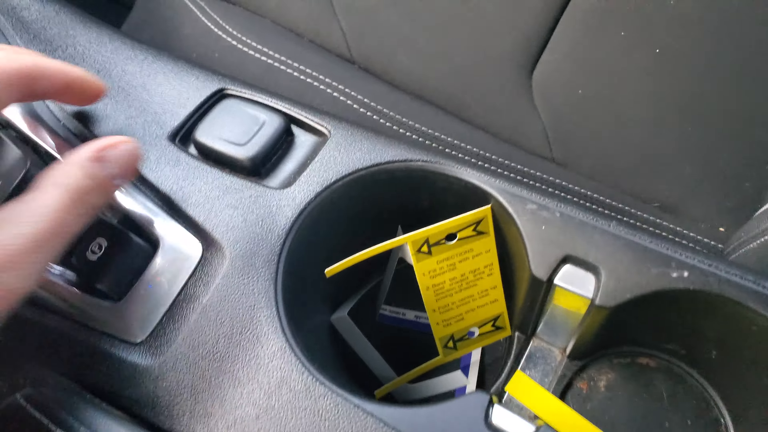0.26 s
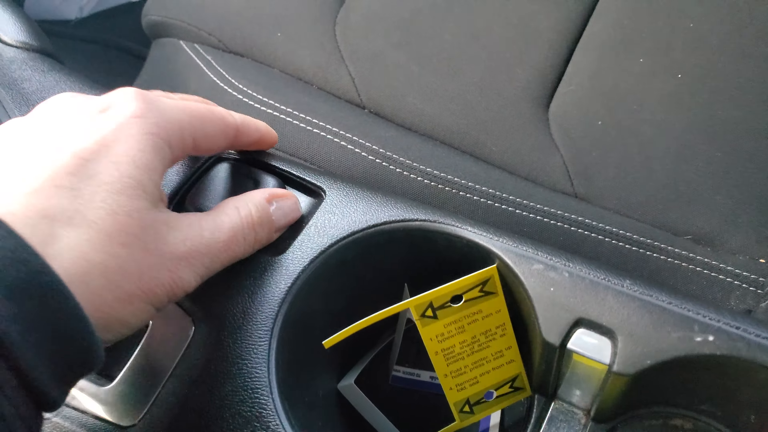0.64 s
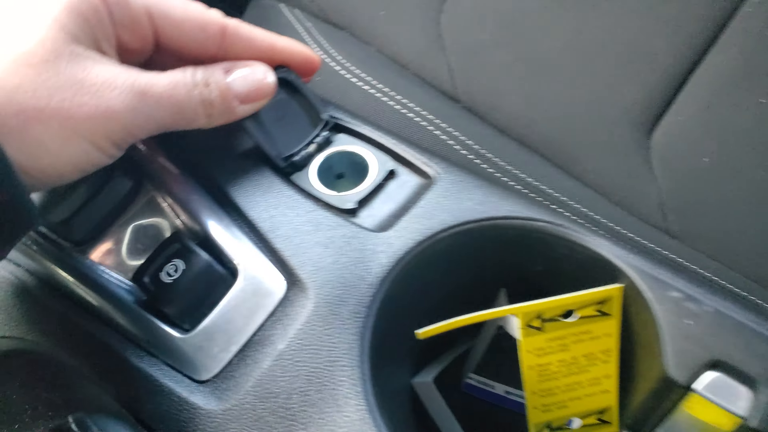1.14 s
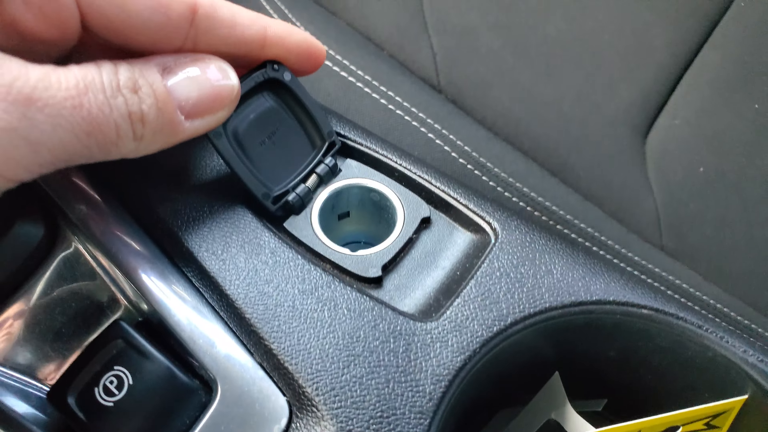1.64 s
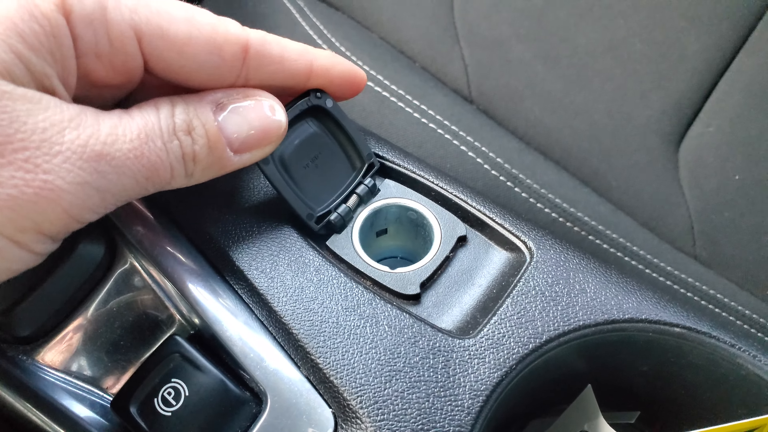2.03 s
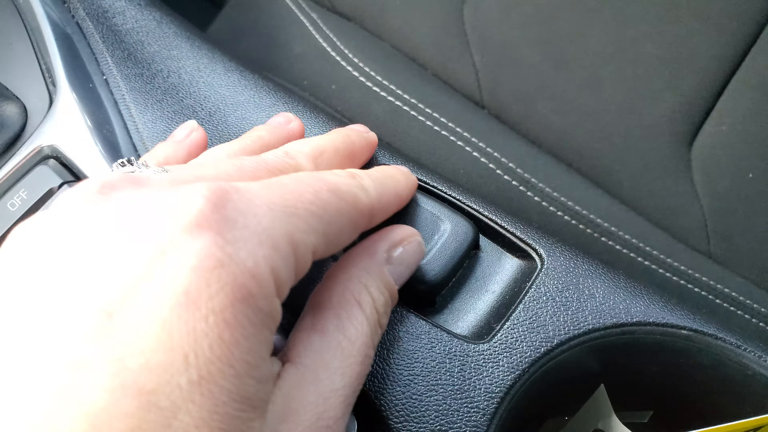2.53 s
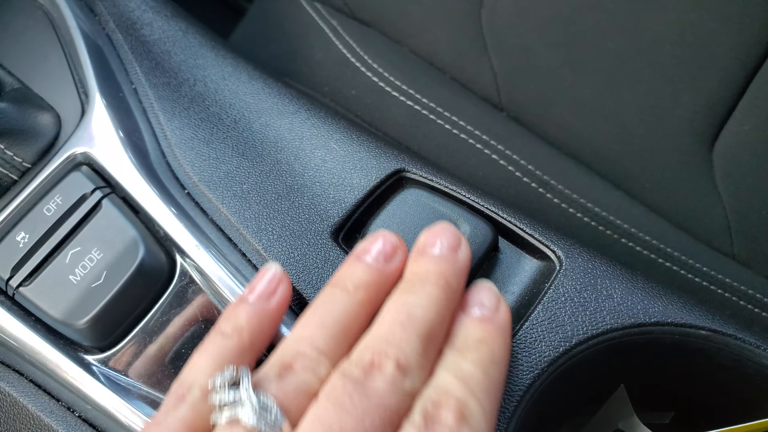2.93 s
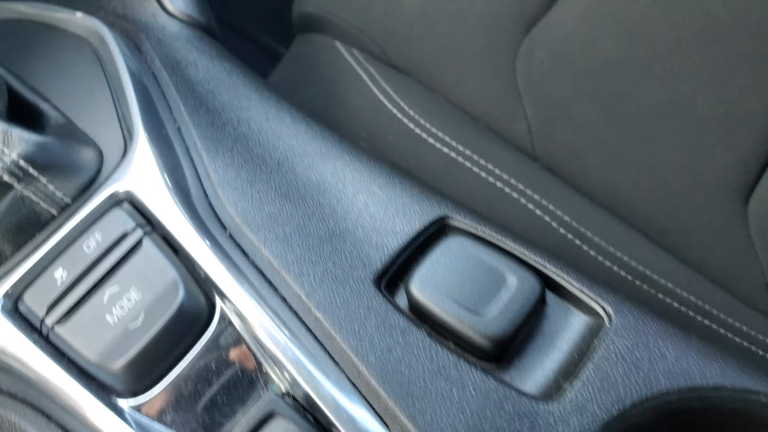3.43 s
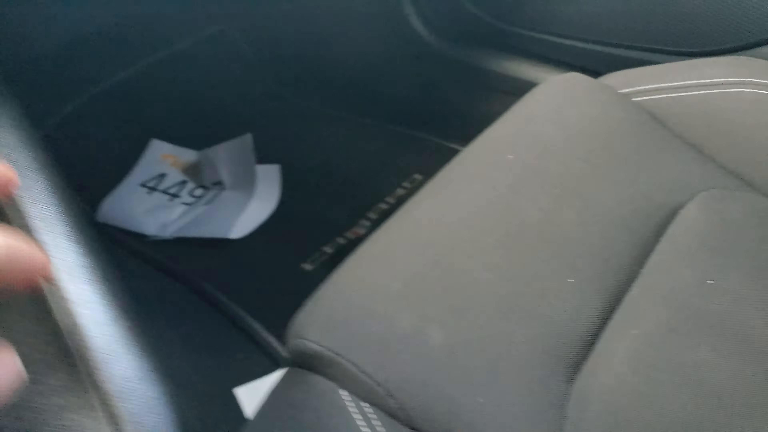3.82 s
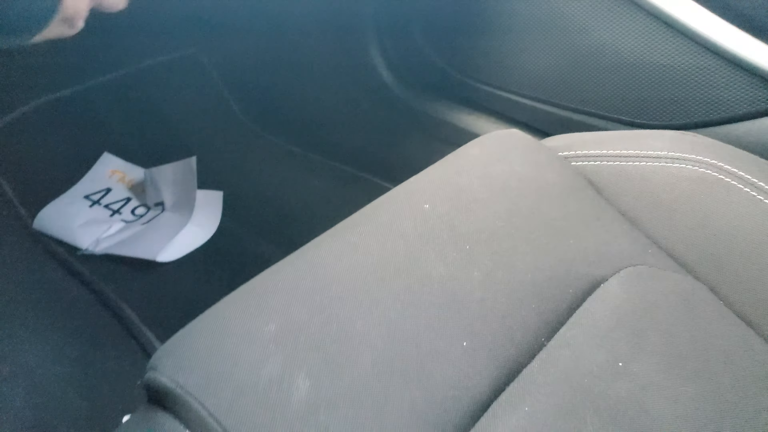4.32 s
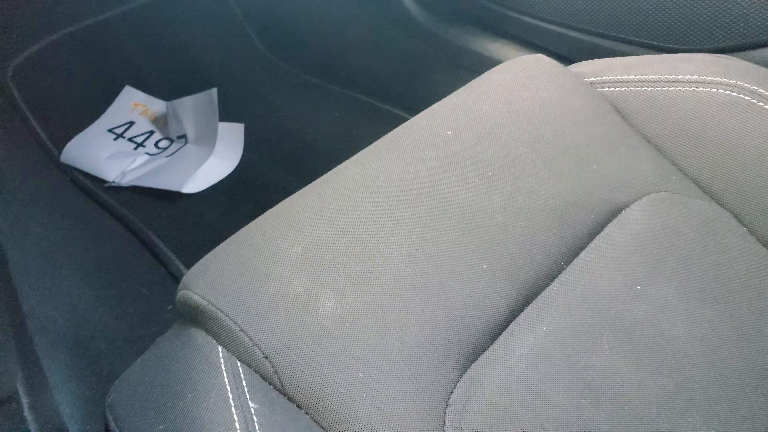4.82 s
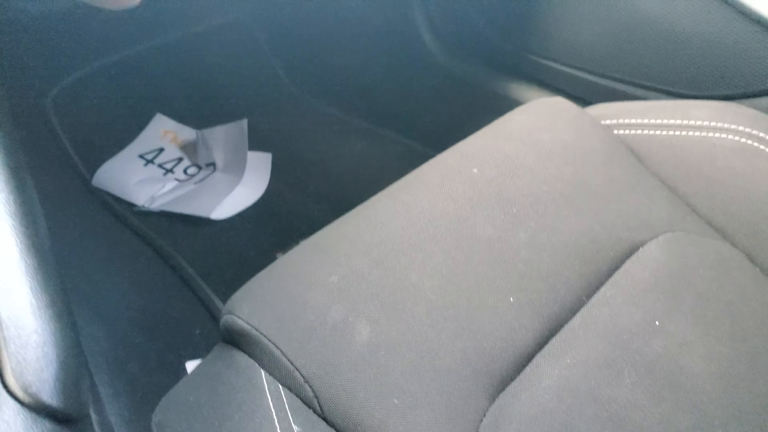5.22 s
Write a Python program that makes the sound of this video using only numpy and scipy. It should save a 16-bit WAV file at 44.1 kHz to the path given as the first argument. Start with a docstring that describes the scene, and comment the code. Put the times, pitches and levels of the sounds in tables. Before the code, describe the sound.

Inside a parked car, an engine idles with a low hum. Close to the microphone, fingers rub and tap the console, click a small plastic socket lid open, then snap it sharply shut. The hum dips for about a second after the snap. A hand swishes over the plastic, a sleeve rustles with dull thumps and light ticks, and two loud knocks ring the hollow trim near the end.

```python
"""An engine hums inside a parked car while a hand flips a power socket's plastic lid open and snaps it shut.
The snap makes the phone turn the hum down for about a second. Then a sleeve rustles past and two
loud knocks ring the plastic trim. The hum is a stack of tones tied to the engine's firing, over a rumble.
Skin and cloth make noise by catching and slipping; struck plastic cracks and rings at its own pitches."""
import sys
import numpy as np
from scipy import signal
from scipy.fft import rfft, irfft, next_fast_len
from scipy.io import wavfile
from scipy.ndimage import uniform_filter1d, minimum_filter1d

SR = 44100
rng = np.random.default_rng(int(sys.argv[2]) if len(sys.argv) > 2 else 0)


def persist_wave(psi):
    """Save psi, clipped to +-1, as 16-bit WAV."""
    counts = np.round(np.clip(psi, -1, 1) * 32767).astype(np.int16)
    wavfile.write(sys.argv[1], SR, np.atleast_2d(counts).T)


N = 241006
T = np.arange(N) / SR
HIT_T = T[:SR // 6]  # the time axis of one short hit

# tone colour of skin rubbing on plastic: f/Hz, level/dB
SKIN = [(200, 4), (600, 3.5), (1000, -1.5), (1400, 2.5), (1900, -6.5), (3000, -4.5), (4200, -2), (5500, -7),
        (6700, -4.5), (8200, -13), (11000, -10.5), (16000, -12.5)]
# tone colour of a plastic crack: f/Hz, level/dB
CRACK = [(100, -8.5), (400, -5), (1200, -4.5), (1900, -8.5), (2750, 5.5), (4500, -2.5), (6500, -2),
         (8000, -7.5), (10500, -6), (13000, -4.5), (16000, -7.5)]


def undb(db):
    """Turn decibels into a number to multiply by."""
    return np.exp(np.asarray(db) * np.log(10) / 20)


def unit(x):
    """Scale a sound to an average (rms) level of 1."""
    return x / np.sqrt(np.mean(x ** 2))


def unit_hit(x):
    """Give each channel of a short sound the energy of 10 ms at level 1."""
    return x / np.sqrt(np.sum(x ** 2, axis=-1, keepdims=True) / (SR / 100))


def add(out, at_s, sound):
    """Mix a stereo sound in at the given time."""
    i = max(int(at_s * SR), 0)
    out[:, i:i + sound.shape[1]] += sound[:, :N - i]


def wander(rate_hz):
    """A smooth random drift that typically strays about 1 from zero."""
    hold = int(SR / rate_hz)
    steps = np.repeat(rng.standard_normal(N // hold + 1), hold)
    return 1.3 * uniform_filter1d(uniform_filter1d(steps, hold), hold)[:N]


def colour(x, points, tilt_db=0, ring_hz=1000, ring_db=0, ring_width=0.12):
    """Shape a sound by (f/Hz, level/dB) points, a tilt in dB per octave and one optional ringing peak."""
    hz, db = np.transpose(points)
    size = 2 * next_fast_len(x.shape[-1] // 2 + 1, real=True)
    spectrum = rfft(x.astype(np.float32), size)
    f = np.maximum(np.fft.rfftfreq(size, 1 / SR), 1)
    shape_db = np.interp(np.log2(f), np.log2(hz), db + tilt_db * np.log2(hz / hz[0]))
    peak_db = ring_db / (1 + ((f / ring_hz - 1) / ring_width) ** 2)
    return irfft(spectrum * undb(shape_db + peak_db), size)[..., :x.shape[-1]]


def soften(x, cutoff_hz, order=2):
    """A softer touch loses the treble above its cutoff."""
    return signal.lfilter(*signal.butter(order, min(cutoff_hz, .45 * SR), fs=SR), x)


def two_mics(noises, apart_hz=650, bass_side=0.12):
    """Spread two noises over the left and right microphones: alike in the bass, unrelated in the treble."""
    mid, side = noises
    side = side - (1 - bass_side) * soften(side, apart_hz, order=1)
    return np.array([mid + side, mid - side])


def stroke(peak_s, length_s, rise, roundness=1.22):
    """Start time and speed (0-1) of a move. Rise is the share spent speeding up; roundness 2 is a bell."""
    start = max(peak_s - 3 * rise * length_s, 0)
    from_peak = T[:3 * SR // 2] + start - peak_s
    width = length_s * np.where(from_peak < 0, rise, 1 - rise)
    return start, np.exp(-np.abs(from_peak / width) ** roundness)


def friction(size, grain_db):
    """Rubbing noise made of tiny slips; more grain makes a few of them stand out."""
    strength = undb(grain_db * np.minimum(rng.exponential(1, size // 16 + 1), 6))
    return two_mics(rng.standard_normal((2, size)) * np.repeat(strength, 16)[:size])


def fade(t60):
    """Die away by 60 dB in t60 seconds, the fade time."""
    return np.exp(-np.log(1000) * HIT_T / t60)


def burst(points, t60, tilt_db=0, ring_hz=1000, ring_db=0, ring_width=.12):
    """A short puff of shaped noise that dies away."""
    noise = two_mics(rng.standard_normal((2, len(HIT_T))))
    return unit_hit(colour(noise, points, tilt_db, ring_hz, ring_db, ring_width) * fade(t60))


def ring_tone(hz, t60, apart_hz=1700):
    """One fading tone of a struck part; high tones reach the two microphones out of step."""
    phase, side = rng.uniform(-np.pi, np.pi, 2)
    lag = np.sign(side) * np.pi / 4 * min(np.sqrt(hz / apart_hz), 1)
    angle = 2 * np.pi * hz * HIT_T + phase + np.array([[lag], [-lag]])
    return np.sin(angle.astype(np.float32)) * fade(t60)


def boom(hz, t60, push_s=0.0038):
    """A low fading tone set going by a slow push, the same on both sides."""
    push = 1 - np.exp(-HIT_T / push_s)
    wave = -np.sin(2 * np.pi * hz * HIT_T) * fade(t60) * push
    return unit_hit(np.array([wave, wave]))


def engine(firing_hz=36.73, drift_hz=.3, shake_db=1.82, uneven_db=2.5, rumble_db=-44.5, throb=0.08):
    """The idling engine hums at multiples of its firing rate, over a rumble that throbs with each firing."""
    # tones of the hum: multiple of the firing rate, base level/dB, dB gained per dB of cabin_spots
    hum_tones = [(1, -34.5, 0.13), (2, -44.5, 0), (3, -53, 0.47), (4, -50, 0.54), (4.5, -53, 0.67),
                 (6, -71.5, -1.17), (9.5, -65, 1)]
    # the phone moves through the cabin's loud and quiet spots (a standing wave): t/s, level/dB
    cabin_spots = [(0, -7.5), (.7, -0.5), (1.4, -2.5), (2.2, -1), (2.7, -3), (3.4, 0), (4.0, 9), (4.4, 5),
                   (5.0, 8), (5.46, 2.5)]
    # tone colour of the low engine and fan rumble, with a faint high hiss on top: f/Hz, level/dB
    rumble_and_hiss = [(20, -14.5), (35, -6), (65, 0), (120, -2.5), (200, -10), (320, -12.5), (440, -13.5),
                       (560, -21), (740, -29), (850, -28), (1200, -40), (2200, -50), (7000, -59.5),
                       (11000, -61.5), (16000, -56.5)]
    spot_db = np.interp(T, *np.transpose(cabin_spots))
    phase = 2 * np.pi * np.cumsum(firing_hz + drift_hz * wander(3)) / SR
    lead = np.pi * firing_hz * 0.00027 * np.array([[1], [-1]])  # the hum arrives 0.27 ms sooner on the left
    hum = 0
    for multiple, db, share in hum_tones:
        # uneven firing disturbs the upper tones more than the lowest one
        wobble_db = shake_db if multiple == 1 else uneven_db
        angle = multiple * (phase + lead) + rng.uniform(0, 2 * np.pi) + 0.1 * wobble_db * wander(12)
        level = undb(db + share * spot_db + wobble_db * wander(12))
        hum = hum + np.sqrt(2) * level * np.sin(angle.astype(np.float32))
    noise = unit(colour(two_mics(rng.standard_normal((2, N))), rumble_and_hiss))
    noise = noise * (1 + throb * np.sin(phase))
    return hum + noise * undb(rumble_db + 0.43 * spot_db - 0.68 * wander(5.6))


def palm(grain_db=1.0, judder_db=1.3):
    """The flat hand glides smoothly over the console with one broad swish."""
    # glides: peak t/s, length/s, level/dB, tilt/dB per octave, swish f/Hz
    glides = [(0.166, 0.93, -63, -2.5, 3300), (2.493, .13, -56, -1.5, 2950), (2.73, 0.22, -66, 1, 3030),
              (2.951, 0.3, -51, 2, 3700), (3.13, 0.22, -49, 0.5, 1700), (3.166, .22, -46.5, 7.5, 12000),
              (3.36, 0.21, -60.5, 5, 11500), (3.615, .12, -53, -1.5, 3000), (4.33, 0.23, -55.5, 5, 12900)]
    out = np.zeros((2, N))
    for peak_s, length_s, db, tilt_db, hz in glides:
        start, speed = stroke(peak_s, length_s, rise=0.49)
        swish = colour(friction(len(speed), grain_db), SKIN, tilt_db, hz, ring_db=8, ring_width=0.17)
        add(out, start, undb(db) * speed * unit(swish))
    return out * undb(judder_db * wander(64))


def sleeve(grain_db=1.46, flutter_db=0.6, dulling_db_per_octave=2.5):
    """Cloth fibres catch and slip; each arm movement is loudest where it is fastest."""
    # arm movements: peak t/s, length/s, level/dB, tilt at full speed/dB per octave
    arm_moves = [(.13, 0.2, -57, -5.5), (1.104, 0.36, -64.5, 1), (1.401, .24, -63.5, -1.5),
                 (3.727, .2, -53.5, -3), (4.06, .5, -47, -3), (4.41, .32, -49, -0.4),
                 (4.587, .09, -51.5, 1), (4.685, .09, -42.5, -1.5), (4.904, 0.12, -55.5, 0.5),
                 (5.064, .14, -48.5, -0.5), (5.341, .085, -51, 2), (5.379, 0.29, -55, -1.5)]
    # tone colour of rubbing cloth: f/Hz, level/dB
    cloth = [(40, 5.5), (100, 2), (250, 7), (700, 3.5), (1600, 4.5), (2400, 1.5), (4000, -2), (6500, -6),
             (8500, -13.5), (12500, -10.5), (16000, -14.5)]
    out = np.zeros((2, N))
    for peak_s, length_s, db, tilt_db in arm_moves:
        # the heavy arm keeps its speed longer than the fingers do
        start, speed = stroke(peak_s, length_s, rise=0.44, roundness=1.65)
        fibres = friction(len(speed), grain_db)
        fast = unit(colour(fibres, cloth, tilt_db))
        slow = unit(colour(fibres, cloth, tilt_db + dulling_db_per_octave))  # thinner; speed dulls it
        rustle = speed * fast + (1 - speed) * slow
        add(out, start, undb(db) * speed * rustle)
    return out * undb(flutter_db * wander(35))


def ticks(echo_db=-18, echo_t60=.06):
    """Nails and small stiff parts tick: a dry crack with one ringing peak, then the cabin's short echo."""
    # light taps: t/s, level/dB, ring f/Hz, ring height/dB, fade time/s
    taps = [(.108, -55, 1330, 29.5, .045), (1.197, -65.5, 3940, -0.5, .012), (2.781, -50.5, 2830, 12, .025),
            (3.2002, -41.5, 5400, 22.5, 0.028), (3.9407, -54.5, 6650, 5.5, 0.019),
            (4.022, -38.5, 6400, -2, 0.033), (4.2417, -38.5, 4270, 21.5, .018),
            (4.5388, -39, 5267, 4.5, 0.049), (4.693, -40.5, 7060, -6, .033), (4.9733, -34, 3400, 2, .03),
            (5.248, -54.5, 3943, 17.5, .05)]
    out = np.zeros((2, N))
    for at_s, db, hz, ring_db, t60 in taps:
        crack = burst(CRACK, t60, ring_hz=hz, ring_db=ring_db, ring_width=0.077)
        crack = unit_hit(soften(crack, cutoff_hz=2.6 * hz))
        echo = undb(echo_db) * burst(SKIN, echo_t60)
        add(out, at_s, undb(db) * unit_hit(crack + echo))
    return out


def fingers(grain_db=0.5, judder_db=3.0):
    """Fingertips catch quickly and judder to rest on the grained plastic, each scrape at its own pitch."""
    # rubs: peak t/s, length/s, level/dB, tilt/dB per octave, scrape f/Hz, scrape height/dB
    rubs = [(0.372, 0.031, -55.5, 1.5, 1370, 6.5), (0.404, .06, -39.5, -1.5, 1334, 8),
            (0.567, .02, -39, -4, 5070, 14), (0.595, 0.065, -49, -1, 1400, 1),
            (0.712, 0.079, -49.5, 1, 6700, 6.5), (0.841, 0.026, -59.5, 3, 6620, 12),
            (2.165, 0.022, -54, -1, 6460, 11), (2.246, 0.021, -60.5, -3, 1400, 19),
            (4.407, .026, -43.5, .3, 2900, 12.5), (4.645, .019, -36.5, -5, 2660, 10.5)]
    out = np.zeros((2, N))
    for peak_s, length_s, db, tilt_db, hz, scrape_db in rubs:
        start, speed = stroke(peak_s, length_s, rise=.3)
        scrape = colour(friction(len(speed), grain_db), SKIN, tilt_db, hz, scrape_db, ring_width=0.073)
        add(out, start, undb(db) * speed * unit(scrape))
    return out * undb(judder_db * wander(64))


def knocks(crack_db=-4.5, pitch_scatter=0.012, chatter_s=.007, chatter_db=-4, soft_touch_hz=500):
    """Blows chatter on the hollow trim; a soft one has less treble and makes the panel thud more."""
    # blows on the console: t/s, level/dB, cutoff f/Hz (lower is softer), pitch factor of the spot hit
    blows = [(.397, -48.5, 1000, .86), (0.428, -40.5, 470, .78), (0.456, -46.5, 420, 0.78),
             (.564, -44, 700, .76), (.623, -42.5, 800, 0.77), (1.015, -41, 1101, .85),
             (2.381, -31.5, 1000, 1.2), (2.408, -27.5, 1100, 1), (2.782, -50.5, 3300, 1),
             (3.2261, -44.5, 2300, 1.2), (3.718, -52, 1505, .58), (4.641, -41, 3427, .88),
             (4.69, -27.5, 700, 1.02), (4.7002, -20.5, 1500, .98), (4.975, -52.5, 1445, 1),
             (5.0644, -10.5, 4960, .975)]
    # tones the trim rings at: f/Hz, level/dB, fade time/s
    trim_tones = [(190, -6, 0.057), (285, -15, 0.1), (380.7, -6, .045), (445, -0.5, 0.08), (622, -3, .05),
                  (822, -4, .055), (1045, 1, 0.037), (1189, -2, 0.044), (1340, -5.5, 0.048),
                  (1569, 3.5, 0.036), (1858, -0.5, .032), (2030, -3, .035), (2440, -7.5, 0.06),
                  (2920, -7.5, .03), (3400, 0.5, .03), (4020, -2, 0.016), (4200, 2.5, 0.029),
                  (5650, -16, .02), (6660, -4.5, .016)]
    out = np.zeros((2, N))
    for at_s, db, cutoff_hz, pitch in blows:
        blow = 0
        # three unevenly spaced contacts, each weaker than the last and on a slightly different spot
        lateness = np.append(0, (np.arange(1, 3) - rng.random(2)) / 2)
        for late in lateness:
            ring = 0
            for hz, tone_db, t60 in trim_tones:
                spot_hz = hz * pitch * (1 + pitch_scatter * rng.standard_normal())
                ring = ring + undb(tone_db) * ring_tone(spot_hz, t60)
            contact = unit_hit(ring) + undb(crack_db) * burst(CRACK, t60=0.033, tilt_db=1.9)
            blow = blow + undb(late * chatter_db) * np.roll(contact, int(late * chatter_s * SR), axis=1)
        add(out, at_s, undb(db) * unit_hit(soften(blow, cutoff_hz, order=1)))
        thud_db = 3.5 - 8.5 * np.log2(cutoff_hz / soft_touch_hz)
        add(out, at_s, undb(db + thud_db) * boom(hz=268.4, t60=0.06))
    return out


def lid(ring_db=-1, crack_t60=0.0087, buzz_t60=0.059):
    """The lid's plug drags in the socket, then the lid cracks, rings and buzzes briefly on its hinge."""
    # drags just before opening and shutting: peak t/s, length/s, level/dB
    drags = [(0.994, .085, -48), (2.381, 0.098, -50)]
    # tone colour of the dragging plug: f/Hz, level/dB
    plug = [(200, 1), (900, -2.5), (1350, 10), (1900, -7), (3200, -3.5), (3900, 3.5), (5200, -6),
            (6300, 3.5), (8000, -14), (10200, -3.5), (12500, -11), (16000, -10.5)]
    # the lid pops open, later snaps shut and rattles home: t/s, level/dB, cutoff f/Hz, buzz level/dB
    snaps = [(1.014, -29.5, 4950, -7), (2.3935, -11, 19000, -7), (2.408, -15, 12000, 1),
             (2.415, -21, 10000, 0.5), (2.419, -19.5, 7000, -2)]
    # tones the lid rings at: f/Hz, level/dB, fade time/s
    lid_tones = [(1330, -12, .03), (2450, -15, 0.017), (2940, -10.5, 0.026), (3676, 1.5, 0.032),
                 (4130, -3.5, 0.034), (4580, -1.5, 0.023), (7100, -12, .02), (10620, 11.5, 0.0074),
                 (14200, 5.5, 0.0028)]
    out = np.zeros((2, N))
    for peak_s, length_s, db in drags:
        start, speed = stroke(peak_s, length_s, rise=.5)
        scrape = colour(friction(len(speed), grain_db=0), plug)
        add(out, start, undb(db) * speed * unit(scrape))
    for at_s, db, cutoff_hz, buzz_db in snaps:
        ring = unit_hit(sum(undb(tone_db) * ring_tone(hz, t60) for hz, tone_db, t60 in lid_tones))
        snap = burst(CRACK, crack_t60) + undb(ring_db) * ring + undb(buzz_db) * burst(CRACK, buzz_t60)
        add(out, at_s, undb(db) * unit_hit(soften(snap, cutoff_hz)))
    return out


def thumps():
    """Slow pushes set the panels and the cabin air booming."""
    # dull pushes: t/s, level/dB, f/Hz, fade time/s
    pushes = [(3.63, -25, 86.6, .14), (3.715, -28.5, 105.4, .15), (4.23, -30, 86.5, .15),
              (4.702, -24.5, 71.2, .23), (4.705, -16.5, 113.6, 0.31), (4.753, -17.5, 86, .045),
              (4.802, -21.5, 55, 0.11), (4.9, -31, 54.35, .12), (5.064, -24.5, 90, .053),
              (5.108, -24.5, 85.3, .074)]
    out = np.zeros((2, N))
    for at_s, db, hz, t60 in pushes:
        add(out, at_s, undb(db) * boom(hz, t60))
    return out


def scene():
    """The idling engine and everything the hand does, as the two microphones pick it up."""
    # the microphones sit differently in the cabin: f/Hz, left minus right level/dB
    balance = [(35, 1.5), (70, -2.5), (140, -2), (330, 0.5), (600, 1), (1200, 0), (3000, -0.5),
               (10000, 1.5)]
    left, right = engine() + fingers() + palm() + sleeve() + lid() + ticks() + knocks() + thumps()
    left = colour(left, [(hz, db / 2) for hz, db in balance])
    right = colour(right, [(hz, -db / 2) for hz, db in balance])
    return np.array([left, right])


def gain_control(x, treble_hz=9000, limit_db=-21, max_cut_db=12, hold_s=0.97, recover_db_per_s=13):
    """A sharp treble peak makes the phone turn the volume down, hold it there, then let it creep back."""
    treble = signal.sosfilt(signal.butter(4, treble_hz, "high", fs=SR, output="sos"), x)
    power = uniform_filter1d(np.mean(treble ** 2, axis=0), size=128)
    level_db = 10 * np.log10(np.abs(power) + 1e-12)
    cut_db = np.clip(2 * (level_db - limit_db), 0, max_cut_db)
    half_hold = int(hold_s * SR) // 2
    held_db = -minimum_filter1d(-cut_db, 2 * half_hold + 1, origin=half_hold, mode="constant")
    ramp_db = recover_db_per_s * T
    released_db = np.maximum.accumulate(held_db + ramp_db) - ramp_db
    smooth_db = uniform_filter1d(released_db, size=128)
    # it looks 10 ms ahead, so the volume is down before the peak arrives
    return x * undb(-np.interp(T + 0.01, T, smooth_db))


def record(dry, top_hz=16000):
    """The phone adjusts its volume, clips the peaks and cuts the highest treble."""
    clipped = np.clip(gain_control(dry), -1, 1)
    return signal.sosfilt(signal.ellip(8, .2, 70, top_hz, fs=SR, output="sos"), clipped)


dry = scene()
out = record(dry)
persist_wave(out)
```